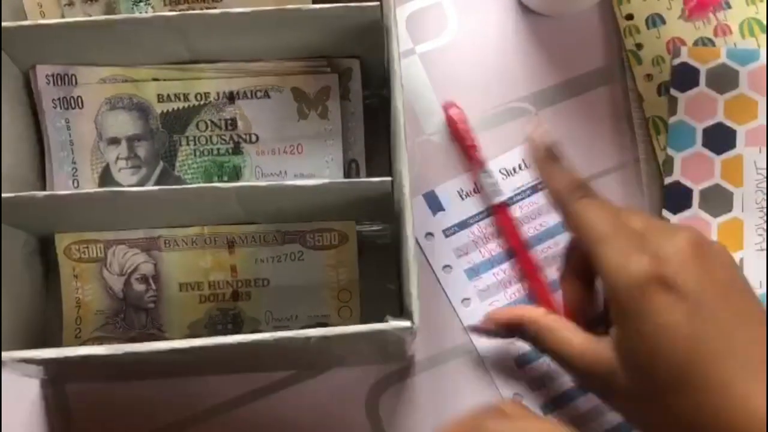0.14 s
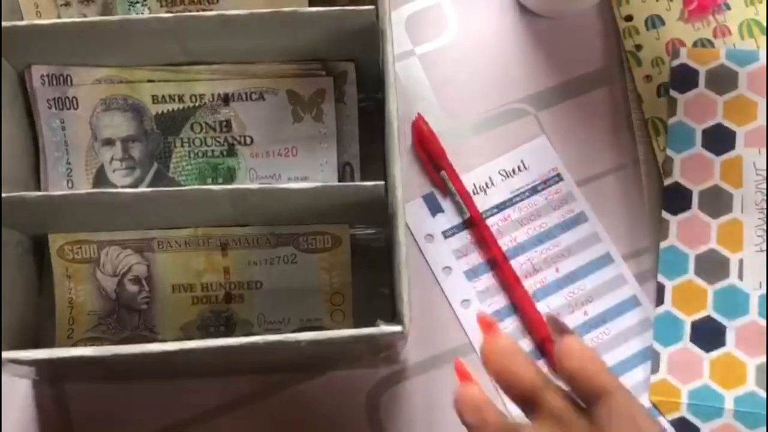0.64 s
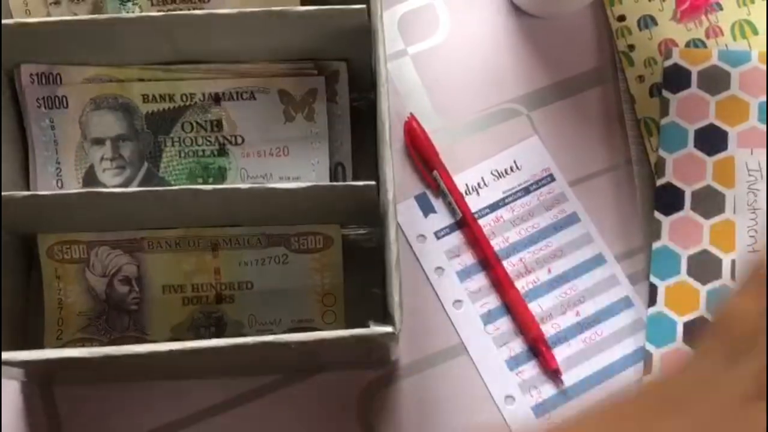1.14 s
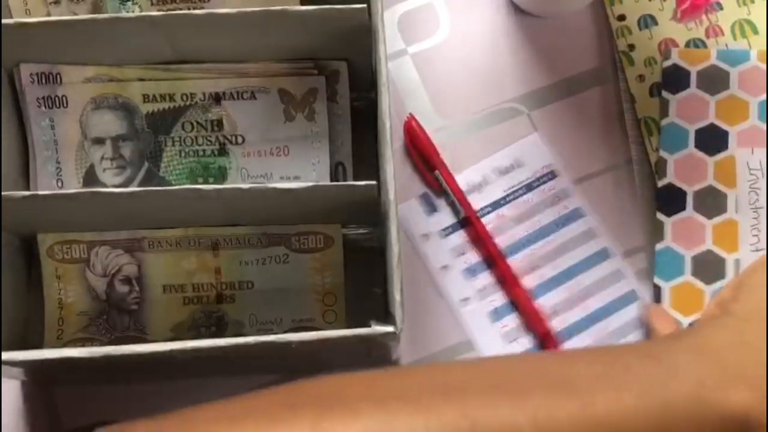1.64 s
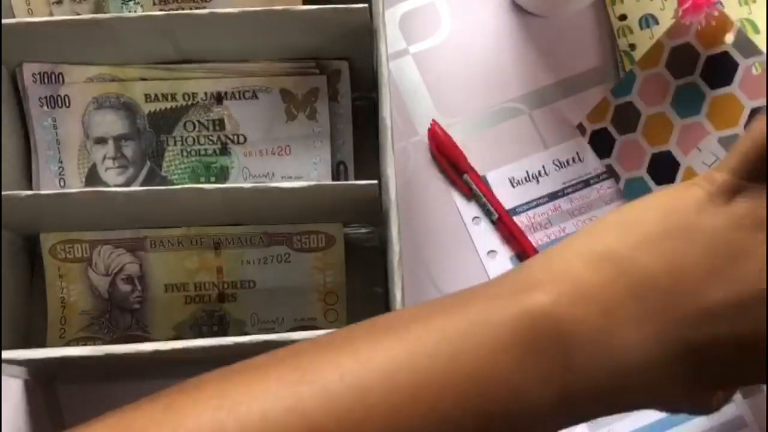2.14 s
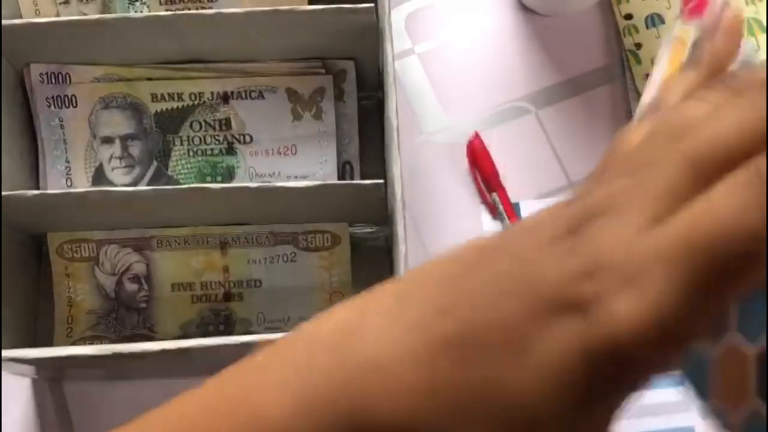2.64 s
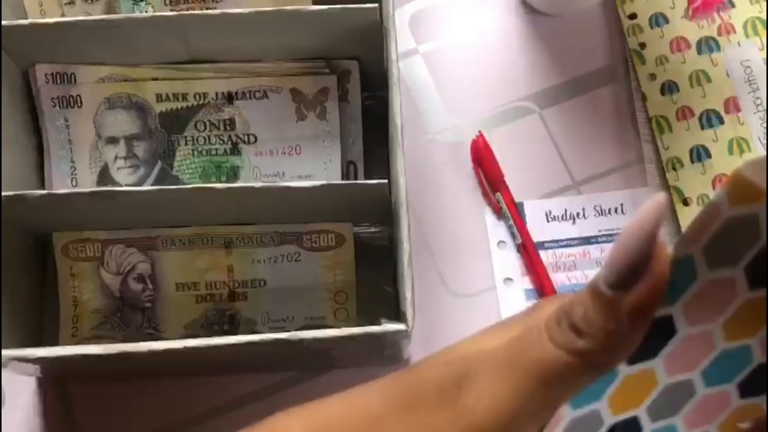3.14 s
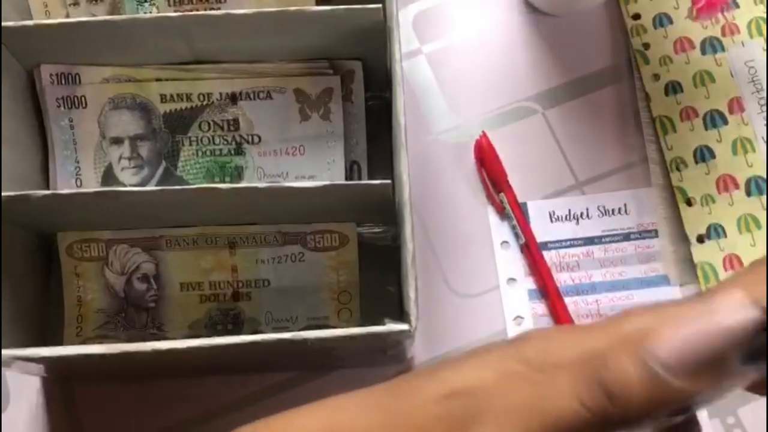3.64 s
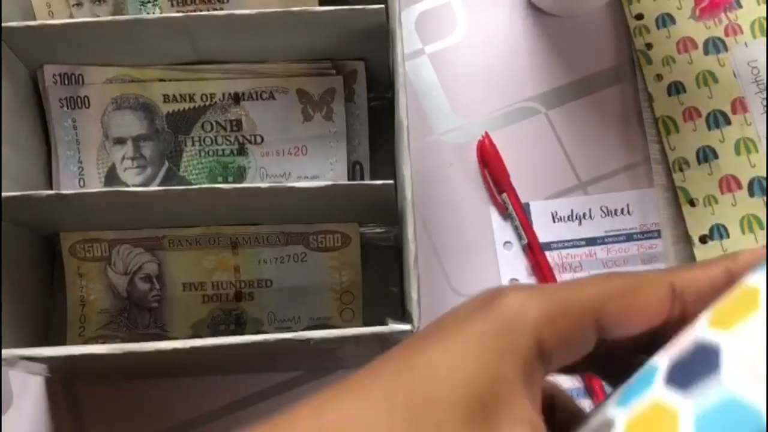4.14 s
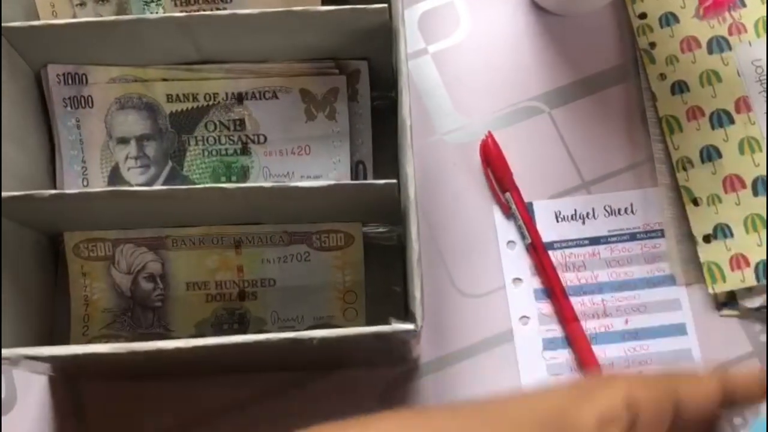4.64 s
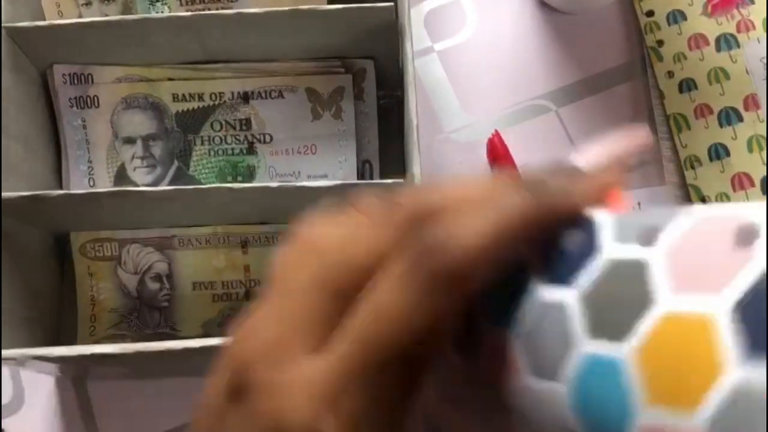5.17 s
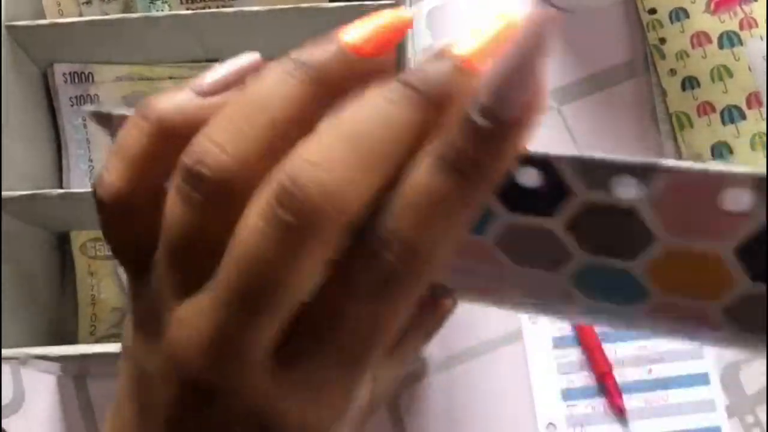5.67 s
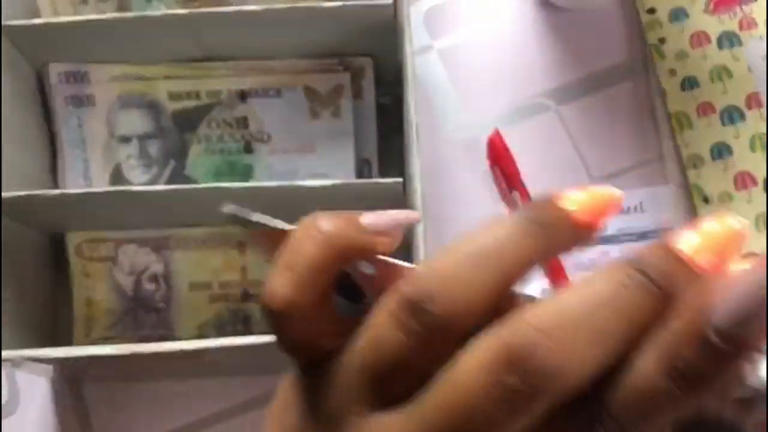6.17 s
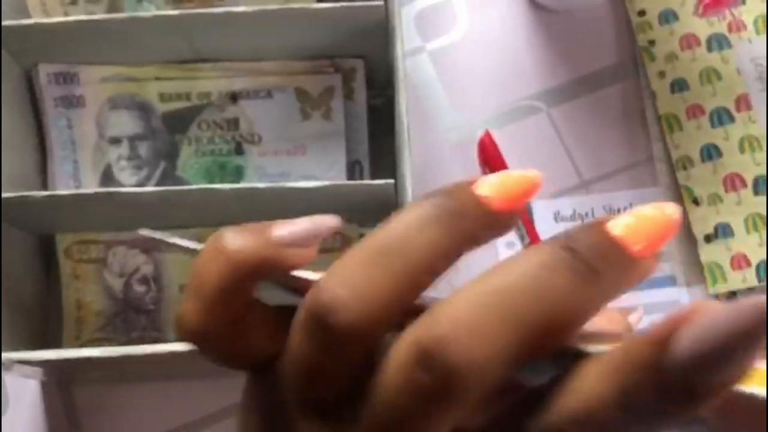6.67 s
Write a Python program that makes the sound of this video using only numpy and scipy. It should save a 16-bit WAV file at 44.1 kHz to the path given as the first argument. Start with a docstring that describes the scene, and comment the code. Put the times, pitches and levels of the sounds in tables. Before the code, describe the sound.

Close to a phone microphone in a small quiet room, a plastic pen drops on a desk and bounces with quick hard clicks. Sparse paper rustles, crease snaps and light nail taps follow. After about four seconds the handling thickens, an envelope lands with a loud flat slap, and stiff paper is rubbed, flexed and snapped until the end.

```python
"""Stiff paper envelopes handled on a desk close to a phone, in a quiet small room. Strokes of skin and sheets
are patchy noise and fibre slips through the resonances of paper and air pocket. Creases snap and nails tap as
short noise bursts that ring the sheet; an edge drags, and skin and paper squeak. One envelope lands flat, a
plastic pen drops and bounces, and palms bump the desk, all struck resonances. Behind lie a short room answer, a
far airy swell and steady room tone, all shaped noise."""
import sys
import numpy as np
from scipy import signal
from scipy.fft import rfft, irfft, next_fast_len
from scipy.io import wavfile
from scipy.ndimage import uniform_filter1d, map_coordinates

SR = 44100
rng = np.random.default_rng(int(sys.argv[2]) if len(sys.argv) > 2 else 0)


def bounce(signal):
    """Save signal as a 16-bit WAV file at the path given by the first command-line argument."""
    frames = np.transpose(np.atleast_2d(signal))
    limited = np.clip(frames, -1, 1)
    pcm = np.round(limited * 32767).astype(np.int16)
    wavfile.write(sys.argv[1], SR, pcm)


def amplitude_ratio(level_db):
    """Convert a level in decibels to the matching linear amplitude (field) ratio."""
    exponent = np.asarray(level_db, float) / 20
    return 10 ** exponent


N = 299439  # length in samples


def unit(x):
    """Scaled to rms 1."""
    return x / np.sqrt(np.mean(x ** 2) + 1e-20)


def peaked(x):
    """Scaled to peak 1."""
    return x / np.abs(x).max()


def noise():
    """White noise as long as the scene."""
    return rng.standard_normal(N)


def along(points, hz):
    """(f/Hz, value) points read on a log frequency axis."""
    f, value = np.transpose(points)
    return np.interp(np.log(hz + 1), np.log(f + 1), value)


def over_time(rows):
    """(t/s, value) points, one value per sample."""
    return np.interp(np.arange(N) / SR, *np.transpose(rows))


def filtered(x, response):
    """x times a complex response of frequency."""
    m = next_fast_len(len(x) + 8192)  # room for the ringing
    return irfft(rfft(x, m) * response(np.fft.rfftfreq(m, 1 / SR)), m)[:len(x)]


def resonances(modes):
    """Causal response of modes (f/Hz, width/Hz, level/dB), each opposite in sign to the one before."""
    def response(f):
        total = 0
        for k, (centre, width, db) in enumerate(modes):
            mode = 1j * f * width / (centre * centre - f * f + 1j * f * width)
            total = total + (-1) ** k * amplitude_ratio(db) * mode
        return total
    return response


def wobble(rate):
    """A smooth random curve, rate knots a second."""
    knots = rng.standard_normal(int(N * rate / SR) + 4)
    return map_coordinates(knots, [np.arange(N) * rate / SR])


def add(track, s, sound):
    """Mixes a short sound into a track, starting at s seconds."""
    track[round(s * SR):][:len(sound)] += sound


def burst(length, rise):
    """Noise that swells over rise seconds while it dies 60 dB every length seconds."""
    t = np.arange(SR // 5) / SR
    return rng.standard_normal(len(t)) * amplitude_ratio(-60 * t / length) * (1 - np.exp(-(t / rise) ** 2))


def jolts(length, rise):
    """A blow as one-way contact force that chatters as it dies."""
    return np.abs(burst(length, rise))


def push(length):
    """A smooth one-way contact force, length in seconds."""
    return np.pad(np.hanning(max(round(length * SR), 3)), (0, SR // 5))[:SR // 5]


def crack(strike):
    """The bright edge of a hit: two broad treble resonances, scaled to peak 1."""
    return peaked(filtered(strike, resonances([(4500, 5000, -0.5), (10800, 4300, 0)])))


def bent(x):
    """Bending waves carry the bass more slowly, so a knock through sheet and desk glides downwards."""
    lag_cycles = 1.089  # well above 40 Hz each tone arrives this many of its own cycles late
    return filtered(x, lambda f: np.exp(-2j * np.pi * lag_cycles * np.log(1 + f / 40)))


# Strokes of skin and sheets, and the pen's rattle, before the flutter of the grip:
# (t/s of the peak, rise/s, fall/s, fingertip hiss level/dB, sheet scrape level/dB)
STROKE_ROWS = [(.01, .1, 0.12, -66.5, -67), (0.121, 0.044, 0.074, -60, -61.5),
               (0.153, 0.013, 0.051, -35.5, -39), (0.201, 0.025, 0.091, -46, -38.5),
               (.25, .08, 0.17, -62, -50), (0.518, 0.049, 0.065, -45.5, -48.5),
               (.587, 0.046, 0.073, -48.5, -50), (.75, 0.2, 0.14, -64, -65.5), (.845, .04, 0.057, -61, -64),
               (.9, 0.019, 0.077, -55.5, -61.5), (.986, 0.032, 0.041, -52.5, -64.5),
               (1.05, 0.048, .03, -67, -66.5), (1.112, 0.043, 0.038, -51, -53.5),
               (1.169, 0.047, 0.033, -54.5, -65), (1.635, 0.032, 0.068, -68, -58.5),
               (1.69, 0.051, 0.058, -42, -64), (1.87, 0.13, 0.11, -55.5, -62.5),
               (1.928, 0.053, 0.12, -64.5, -60.5), (2.031, 0.038, 0.066, -52.5, -55),
               (2.096, 0.013, 0.063, -50.5, -62), (2.32, 0.037, 0.086, -48, -62),
               (2.385, 0.12, .06, -49.5, -68), (2.42, 0.053, 0.063, -63, -59),
               (2.458, 0.042, 0.053, -55.5, -70), (2.68, 0.22, 0.19, -66.5, -64.5),
               (2.76, .05, 0.1, -72, -68), (2.955, 0.041, 0.15, -59, -68.5), (3.12, 0.19, 0.2, -55.5, -69),
               (3.25, 0.14, .1, -62.5, -71), (3.48, 0.16, .15, -77, -77.5), (3.61, .02, 0.2, -59, -57),
               (3.85, 0.59, 0.23, -63, -63), (4.009, 0.019, 0.012, -46, -46),
               (4.194, 0.26, 0.079, -52, -52.5), (4.3, 0.038, 0.12, -46.5, -48),
               (4.37, 0.16, 0.065, -51.5, -53.5), (4.48, 0.11, 0.055, -54.5, -56),
               (4.533, 0.024, 0.089, -60, -52.5), (4.635, 0.064, 0.2, -51.5, -54.5),
               (4.72, 0.16, 0.056, -48, -58), (4.783, .015, 0.065, -53.5, -41.5),
               (4.929, 0.049, 0.052, -43, -45), (5.0, 0.064, 0.04, -41, -39.5), (5.2, .1, 0.13, -85, -73.5),
               (5.47, 0.016, 0.12, -50, -47), (5.535, 0.067, 0.19, -51, -50),
               (5.867, .27, 0.096, -41, -42.5), (5.955, 0.073, 0.041, -53, -50.5),
               (6.038, 0.075, 0.051, -48.5, -49), (6.11, .015, .06, -55, -54),
               (6.195, 0.1, 0.087, -42.5, -42), (6.31, 0.07, 0.053, -53, -51),
               (6.338, 0.011, 0.037, -38.5, -40.5), (6.467, .08, .06, -47.5, -49.5),
               (6.508, 0.054, 0.039, -46, -44.5), (6.625, 0.11, 0.047, -43, -43.5),
               (6.744, 0.079, 0.045, -52, -53)]


def strokes():
    """Hiss and scrape gains: every stroke swells to its peak and fades by one rule; powers add."""
    edge_db, roundness = 24, 1.197  # fade after one rise or fall; roundness 1 = pointed, more = rounder
    t, power = np.arange(N) / SR, np.zeros((2, N))
    for s, rise, fall, hiss_db, scrape_db in STROKE_ROWS:
        near = slice(max(round((s - 2 * rise) * SR), 0), round((s + 2 * fall) * SR))
        away = np.where(t[near] < s, (s - t[near]) / rise, (t[near] - s) / fall)
        level_db = [[hiss_db], [scrape_db]] - edge_db * away ** roundness
        power[:, near] += amplitude_ratio(level_db) ** 2
    return np.sqrt(power)


def fibre_slips():
    """Sparse random clicks, about 450 a second, as fibres let go with uneven force."""
    happens = rng.random(N) < 450 / SR
    force = amplitude_ratio(4 * rng.exponential(size=N).clip(0, 3))  # up to 12 dB stronger than the weakest
    return unit(happens * force * noise())


def friction(grains, share, patchy_db):
    """Noise plus a share of fibre slips; as the sheet flexes, narrow bands swell and fade."""
    z = signal.stft(noise() + share * grains, nperseg=256)[2]
    across_bands = uniform_filter1d(rng.standard_normal(z.shape), size=2, axis=0)
    field = uniform_filter1d(across_bands, size=16, axis=1)
    return signal.istft(z * amplitude_ratio(patchy_db * unit(field)), nperseg=256)[1][:N]


# Spectrum of fingertips on paper, only its shape counts: (f/Hz, level/dB per Hz)
SKIN_TONE = [(3000, -25.5), (5000, -8), (7000, -6.5), (9500, -5), (11500, -5)]


def fingertips(grains):
    """Skin on paper: friction shaped into a treble hiss."""
    rub = friction(grains, share=0.44, patchy_db=2.5)
    return unit(filtered(rub, lambda f: amplitude_ratio(along(SKIN_TONE, f))))


# Resonances of a sheet: (f/Hz, width/Hz, level/dB)
SHEET_MODES = [(1930, 650, 5), (2600, 970, 6.5), (3500, 970, 5.5), (4570, 720, 5), (5340, 1170, 4),
               (6550, 1760, 1)]


def sheets(grains):
    """Sheet on sheet: friction rings the paper, and a thin sheet radiates little bass."""
    rub = friction(grains, share=0.6, patchy_db=4.0)
    radiation = resonances([(3600, 5000, 0)])
    return unit(filtered(rub, lambda f: resonances(SHEET_MODES)(f) * radiation(f)))


# Resonances of the envelope's air pocket: (f/Hz, width/Hz, level/dB)
POCKET_MODES = [(542, 266, 0), (937, 94, 4.5), (1177, 260, 6.5), (1616, 910, 0)]


def air_pocket(grains):
    """Friction on the paper walls booms in the enclosed air."""
    return unit(filtered(friction(grains, share=0.51, patchy_db=3.0), resonances(POCKET_MODES)))


# Weight of the hands on the desk, before its slow lumps: (t/s, rumble level/dB)
HAND_WEIGHT = [(0, -59.5), (.13, -70), (.2, -47.5), (.45, -63.5), (.52, -65.5), (.7, -67), (1.55, -73),
               (1.65, -52), (1.8, -67.5), (2.1, -64), (2.85, -68.5), (2.96, -61.5), (3.1, -71), (4.0, -63),
               (4.7, -71), (4.79, -54), (4.92, -75), (5.01, -56), (5.15, -72), (5.43, -65), (5.5, -61.5),
               (6.79, -62)]


def desk_rumble(boom_gain):
    """The hands' weight and the strokes shake the desk's low resonances in slow lumps."""
    desk = resonances([(93, 50.0, -0.5), (219, 124, -1.0), (364, 270, -5.5)])
    rumble = unit(filtered(noise(), desk))
    shaken = amplitude_ratio(-7.5) * boom_gain  # strokes shake the desk 7.5 dB under the pocket
    return amplitude_ratio(1.5 * wobble(25)) * np.hypot(amplitude_ratio(over_time(HAND_WEIGHT)), shaken) * rumble


# How much the air pocket joins the scrape: (t/s, level/dB over the scrape)
POCKET_SHARE = [(0, -12), (.19, -0.5), (.24, 4.5), (.35, 6.5), (.47, 8), (.55, -11.5), (1.2, -5.5),
                (1.7, -5), (1.9, 1), (2.4, -3.5), (3.1, -5.5), (3.9, -4), (4.29, 1), (4.4, 1), (4.7, -11.5),
                (4.8, 8), (4.87, 0), (5.0, 0.5), (5.8, -9.5), (5.95, -1.5), (6.3, -7.5), (6.51, 0),
                (6.7, -9.5)]


def rubbing():
    """Strokes drive hiss, sheet, pocket and desk; paper layers share fibre slips and grip flutter."""
    hiss_gain, scrape_gain = strokes()
    boom_gain = scrape_gain * amplitude_ratio(over_time(POCKET_SHARE))
    flutter_db = 1.3 * wobble(60) + 1.3 * wobble(220)
    grains = fibre_slips()
    paper = hiss_gain * fingertips(grains)
    paper += scrape_gain * sheets(grains)
    paper += boom_gain * air_pocket(grains)
    return amplitude_ratio(flutter_db) * paper + desk_rumble(boom_gain)


def sheet_hit(hz, length, crack_db, knock_db):
    """A strike rings the flexed sheet at its own pitch, with a bright crack and a dull knock."""
    strike = burst(length, rise=0.032 * length)  # long hits start softly
    sheet = resonances([(hz, .3 * hz, 0), (2.6 * hz, 1.5 * hz, -10)])
    # soft contact dulls the top
    ring = filtered(strike, lambda f: sheet(f) / (1 + 1j * f / (3.17 * hz)) ** 2)
    # a one-way push
    knock = filtered(np.abs(strike), resonances([(174, 840, -0.5), (436, 180, -13.5)]))
    return bent(peaked(ring) + amplitude_ratio(crack_db) * crack(strike) + amplitude_ratio(knock_db) * peaked(knock))


# Snaps of creases, the ring's level taken before the glide:
# (t/s of the start, ring level/dB, ring f/Hz, crack level/dB over the ring, length/s)
CREASE_SNAPS = [(.109, -44, 6860, -18.5, 0.0088), (0.466, -26, 1130, -13, 0.012),
                (.578, -35, 4500, -15, .017), (0.598, -34, 5400, -22, 0.0066), (0.688, -50, 6020, -8, .01),
                (0.901, -39.5, 3500, -25, 0.011), (0.972, -47, 6000, -31, .013),
                (1.048, -44.5, 5420, -18, 0.019), (1.1, -42.5, 4900, -18, .019),
                (1.617, -36, 9600, -8, .0087), (1.843, -35.5, 3170, -9, 0.013),
                (1.913, -39.5, 2480, -4, .025), (2.032, -35.5, 3100, -16, 0.0055),
                (2.305, -44, 3220, -7, .025), (2.477, -44.5, 2200, -17, .017),
                (2.946, -46.5, 1430, 2, 0.011), (2.746, -52, 2500, 5, .02), (2.922, -52, 2360, -5, 0.014),
                (2.972, -35, 2230, -30, 0.0091), (3.574, -39.5, 2830, -0.5, 0.01),
                (3.599, -26.5, 2630, -2, .02), (3.6, -33, 900, -16, .012), (3.678, -36, 6870, -10, 0.0077),
                (3.904, -40, 4300, -16, 0.014), (3.931, -39.5, 3910, -28, 0.0096),
                (3.999, -42.5, 1450, -13, 0.026), (4.189, -28.5, 2640, -6, 0.0089),
                (4.261, -46, 6000, -8.5, 0.011), (4.529, -23.5, 2940, -6, 0.011),
                (4.631, -38, 8140, -19.5, .0077), (4.973, -26.5, 1800, -12, .02),
                (4.979, -26, 1820, -4.5, 0.023), (4.998, -23.5, 1640, -3, 0.017),
                (5.007, -26.5, 1360, -12, 0.016), (5.449, -31.5, 2260, -17, 0.022),
                (5.467, -29.5, 2320, -4.5, 0.045), (5.504, -42, 2500, -8, .01),
                (5.533, -34, 3570, -8, 0.03), (5.6, -39.5, 4000, -4, 0.012), (5.814, -39, 6000, -6, .008),
                (5.827, -29.5, 5000, -10, 0.0084), (5.843, -36, 1310, -1, 0.0098),
                (5.863, -34, 1250, -4, 0.013), (5.889, -33.5, 1300, -6, 0.015),
                (5.948, -35.5, 1200, -19, 0.029), (6.025, -36, 5000, -8, 0.0088),
                (6.036, -27, 1360, -4.5, 0.016), (6.052, -41, 1330, -12, .014),
                (6.104, -45, 1300, -1, .012), (6.184, -35, 1300, -6, 0.01), (6.204, -32, 1250, -6, 0.01),
                (6.256, -28, 1220, -26, 0.0094), (6.471, -28, 3500, -12, 0.015),
                (6.498, -33.5, 1230, -10, .027), (6.502, -22, 1270, -3, 0.011),
                (6.749, -34, 4920, -12, .015)]


def snaps():
    """A crease flips over and strikes its sheet; a dull push lies 25.5 dB under every ring."""
    out = np.zeros(N + SR)
    for s, db, hz, crack_db, length in CREASE_SNAPS:
        add(out, s, amplitude_ratio(db) * sheet_hit(hz, length, crack_db, knock_db=-25.5))
    return out[:N]


# Nails and knuckles tap the desk through the paper, the ring's level taken before the glide:
# (t/s of the start, ring level/dB, ring f/Hz, knock level/dB over the ring)
NAIL_TAPS = [(.184, -21, 875, -12), (1.122, -47.5, 1660, 1), (1.638, -35, 3900, -2),
             (1.644, -40.5, 477, -19), (2.004, -44.5, 980, -10), (2.093, -29.5, 2660, -9),
             (2.134, -51, 500, 10), (2.247, -42.5, 1080, 3.5), (2.404, -42.5, 2060, -10),
             (3.754, -39, 540, 0), (3.948, -40, 1100, -1.5), (4.136, -38, 720, -26), (4.531, -39, 700, -15),
             (4.602, -42, 670, -20), (5.551, -38, 1760, -0.5), (6.626, -33.5, 5370, 4)]


def taps():
    """A nail or knuckle strikes through the sheet for 14 ms, its crack 13.5 dB under the ring."""
    out = np.zeros(N + SR)
    for s, db, hz, knock_db in NAIL_TAPS:
        add(out, s, amplitude_ratio(db) * sheet_hit(hz, 0.014, -13.5, knock_db))
    return out[:N]


# One stiff edge dragged over the desk: (t/s of the start, t/s of the end, level/dB)
EDGE_DRAGS = [(4.28, 4.409, -47.5)]
# What that edge rings with: (f/Hz, width/Hz, level/dB)
EDGE_MODES = [(1475, 55, 3), (3450, 140, 4), (5200, 110, -0.5), (6340, 650, -3)]


def drag():
    """Steady friction through the edge's few narrow resonances."""
    t, force = np.arange(N) / SR, np.zeros(N)
    for start, end, db in EDGE_DRAGS:
        force += amplitude_ratio(db) * np.interp(t, [start, start + 0.031, end - .025, end], [0, 1, 1, 0])
    return force * unit(filtered(noise(), resonances(EDGE_MODES)))


# Short squeaks, the first of skin on paper: (t/s of the start, tone level/dB, f/Hz, waver/Hz rms, length/s,
# fizz level/dB over the tone)
SQUEAKS = [(1.351, -65, 5200, 200, 0.055, -36), (1.699, -33.5, 10120, 1200, 0.012, -10),
           (6.334, -23.5, 2247, 40, 0.012, 4.5)]


def squeak():
    """Stick-slip locked to one wavering pitch swells and stops, under a fizz."""
    out = np.zeros(N + SR)
    for s, db, hz, waver_hz, length, fizz_db in SQUEAKS:
        envelope = np.hanning(round(length * SR))
        waver = unit(uniform_filter1d(rng.standard_normal(SR // 5), size=40))[:len(envelope)]
        tone = np.sin(2 * np.pi * np.cumsum(hz + waver_hz * waver) / SR)
        fizz = crack(rng.standard_normal(SR // 5))[:len(envelope)]
        add(out, s, amplitude_ratio(db) * envelope * (tone + amplitude_ratio(fizz_db) * fizz))
    return out[:N]


# An envelope lands flat, the bundle's level taken before the glide: (t/s of the start,
# bundle level/dB, rise/s, length/s, sheet level/dB over the bundle, trapped air level/dB over the bundle)
LANDINGS = [(4.7795, -10.5, 0.0022, 0.01, -30, -8.5), (4.2808, -22.5, 0.0014, .007, -34, -8.5)]
# The stuffed envelope as it lands: (f/Hz, width/Hz, level/dB)
BUNDLE_MODES = [(120, 80, -16.5), (370, 130, -2.5), (576, 76, 9.5), (1290, 220, 5.5), (1980, 360, -6),
                (2660, 640, -5)]
# Air squeezed under it: (f/Hz, width/Hz, level/dB)
TRAPPED_AIR = [(585, 47, 3), (864, 470, -6.5)]


def slap():
    """The blow rings the bundle and the air under it; the sheets crack."""
    out = np.zeros(N + SR)
    for s, db, rise, length, sheet_db, air_db in LANDINGS:
        blow = jolts(length, rise)
        bundle = filtered(blow, resonances(BUNDLE_MODES))
        sheet = filtered(blow, resonances(SHEET_MODES))
        squeeze = np.roll(push(0.00071), round(rise * SR))  # starts one rise after the blow
        air = filtered(squeeze, resonances(TRAPPED_AIR))
        hit = peaked(bundle) + amplitude_ratio(sheet_db) * peaked(sheet) + amplitude_ratio(air_db) * peaked(air)
        add(out, s, amplitude_ratio(db) * bent(hit))
    return out[:N]


# The pen landing and bouncing: (t/s of the start, barrel ring level/dB,
# crack level/dB over the ring, desk knock level/dB over the ring)
PEN_BOUNCES = [(0.1472, -15, -14, -19), (0.1989, -14, -2.5, -18), (.227, -21.5, -7, -21),
               (0.2326, -25, 2, -9)]
# The pen's barrel: (f/Hz, width/Hz, level/dB)
BARREL_MODES = [(1250, 200, -13), (1680, 150, -15), (2120, 110, -2), (2550, 120, -4), (3220, 210, 2.5),
                (4000, 450, -7), (5190, 450, -9), (6830, 360, -29.5)]
# The desk top: (f/Hz, width/Hz, level/dB)
DESK_MODES = [(84, 4, 1), (249.8, 6.3, 5), (312, 13, -2), (368.6, 6.9, -2), (454.5, 25, -10.5),
              (553, 34, -11), (900, 91, -11), (1200, 90, -16)]


def pen():
    """Each bounce rings the plastic barrel, cracks and knocks the desk."""
    out = np.zeros(N + SR)
    for s, db, crack_db, knock_db in PEN_BOUNCES:
        ring = peaked(filtered(burst(0.021, rise=0.00022), resonances(BARREL_MODES)))
        click = crack(burst(.012, rise=0.0002))
        knock = peaked(filtered(jolts(0.0016, rise=0.00028), resonances(DESK_MODES)))
        add(out, s, amplitude_ratio(db) * (ring + amplitude_ratio(crack_db) * click + amplitude_ratio(knock_db) * knock))
    return out[:N]


# A wrist or palm bumps the desk softly: (t/s of the start, level/dB, its peak lies 1 dB lower)
PALM_BUMPS = [(1.633, -49), (2.098, -57), (2.952, -46), (2.978, -52), (4.989, -56), (5.459, -41),
              (5.541, -52), (5.74, -51), (5.893, -41), (6.025, -49), (6.198, -45), (6.438, -46),
              (6.499, -47), (6.621, -52), (6.749, -58)]
# The desk's lowest tones under a palm: (f/Hz, width/Hz, level/dB)
PALM_MODES = [(93.5, 38, 1), (190, 58, -3.5)]


def thuds():
    """A soft push of 8 ms rings the desk's lowest tones."""
    out = np.zeros(N + SR)
    for s, db in PALM_BUMPS:
        add(out, s, amplitude_ratio(db - 1) * peaked(filtered(push(0.008), resonances(PALM_MODES))))
    return out[:N]


# How long the room rings: (f/Hz, time to fall 60 dB/s)
ROOM_DECAY = [(100, 0.19), (500, 0.41), (4000, 0.44), (10000, 0.22)]


def room(x):
    """A noise tail of unit energy, 200 samples late; each frequency dies at its own speed."""
    hz, t, z = signal.stft(rng.standard_normal(SR // 2), SR, nperseg=256)
    decay = amplitude_ratio(-60 * t / along(ROOM_DECAY, hz)[:, None])
    tail = signal.istft(z * decay, SR, nperseg=256)[1]
    return signal.fftconvolve(np.pad(x, (200, 0)), tail / np.linalg.norm(tail))[:N]


# A far airy swell around 1 kHz: (t/s, level/dB)
FAR_SWELL = [(0, -88.5), (2.3, -88), (2.7, -69), (3.2, -85), (3.5, -72), (4.0, -66.5), (5.05, -86),
             (5.35, -67), (6.0, -65), (6.79, -78)]


def swell():
    """Smooth far noise through two resonances, closed off steeply above 1150 Hz."""
    shape = resonances([(650, 300, -5), (980, 200, 1)])
    air = filtered(noise(), lambda f: shape(f) / (1 + (f / 1150) ** 8))
    return amplitude_ratio(over_time(FAR_SWELL)) * unit(air)


# Spectrum of the room tone, only its shape counts: (f/Hz, level/dB per Hz)
HUSH_TONE = [(15, -40.5), (25, 18), (64, 15), (154, -7), (500, -6), (1000, -10.5), (1800, -13.5),
             (3630, -16.5), (10500, -21.5), (11400, -21.5), (12300, -43.5), (16000, -69.5), (22000, -120)]


def room_tone():
    """Steady noise in the shape of the quiet room, at -64 dB rms."""
    return amplitude_ratio(-64) * unit(filtered(noise(), lambda f: amplitude_ratio(along(HUSH_TONE, f))))


def scene():
    """Hits and rubbing near the phone, the room behind, steady room tone."""
    rub = rubbing() + drag()
    hits = snaps() + taps() + squeak() + slap() + pen() + thuds()
    answer = room(amplitude_ratio(-14) * hits + amplitude_ratio(-17.0) * rub)
    return (rub + hits + answer + swell() + room_tone())[None]


def low_pass(x):
    """Removes everything above the highest recorded frequency."""
    return signal.sosfilt(signal.butter(12, 12440, fs=SR, output="sos"), x)


def record(dry):
    """The phone's microphone drops the deep bass and the very top."""
    def microphone(f):
        return (1j * f / (1j * f + 55)) ** 4 / (1 + (f / 11800) ** 60)
    heard = filtered(dry[0], microphone)
    return low_pass(heard[None])


dry = scene()
out = record(dry)
bounce(out)
```